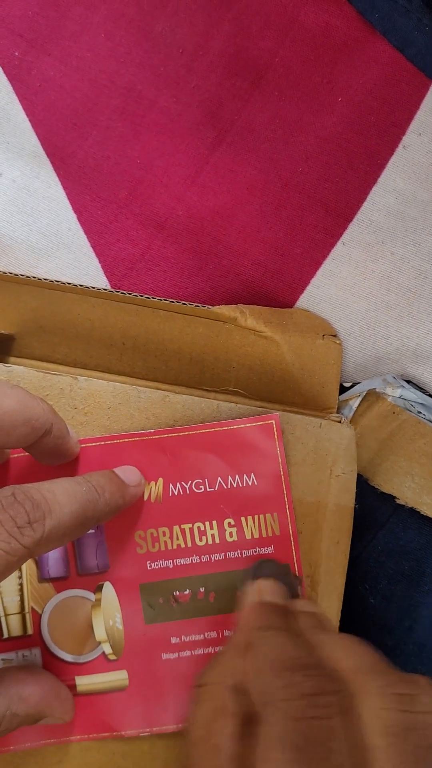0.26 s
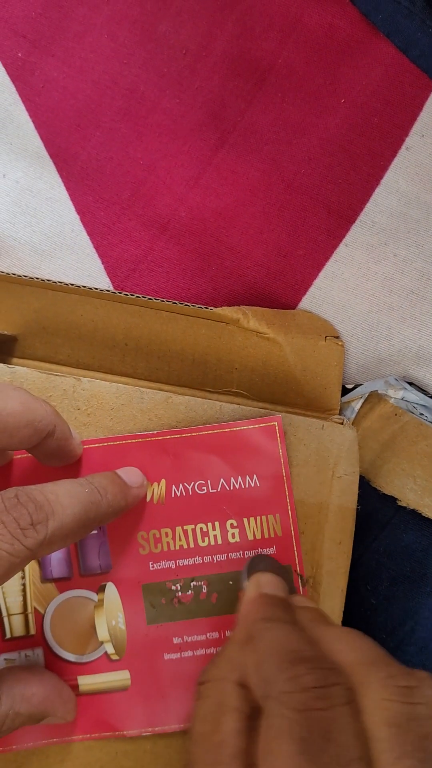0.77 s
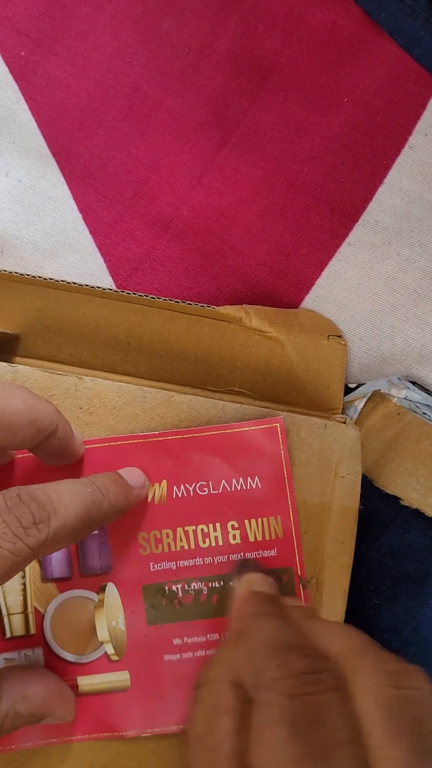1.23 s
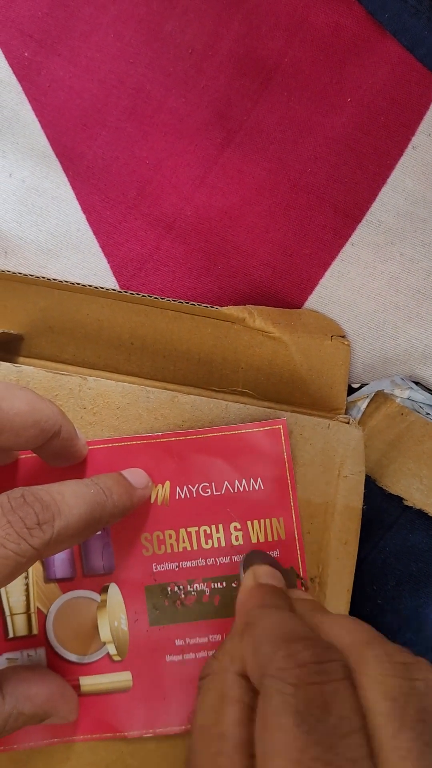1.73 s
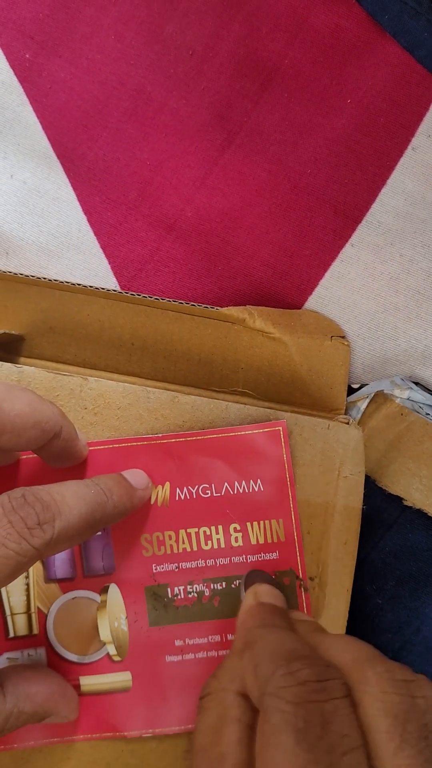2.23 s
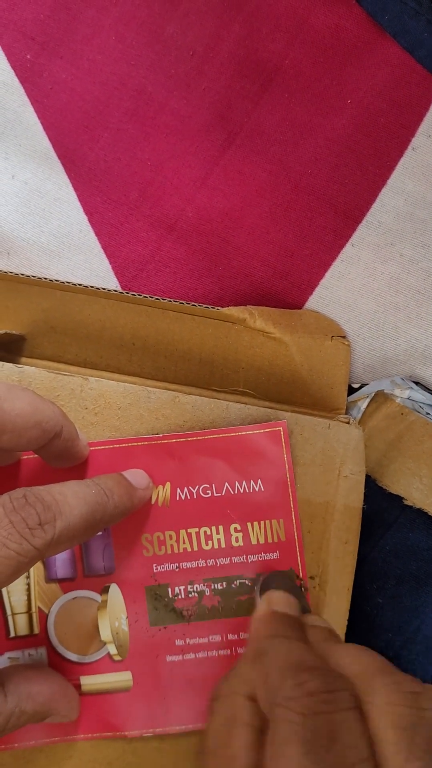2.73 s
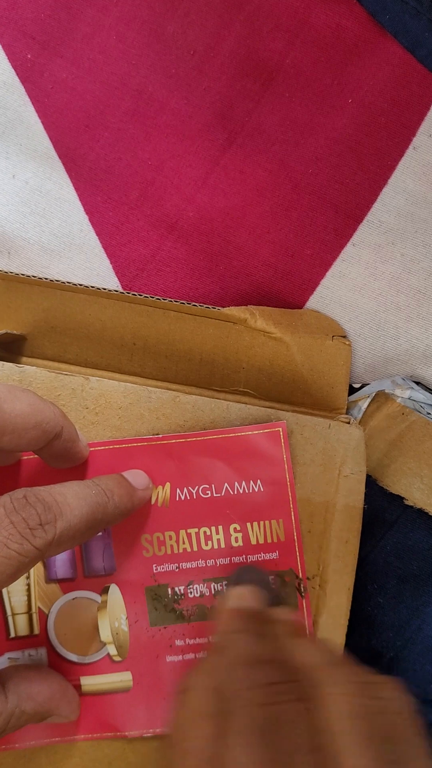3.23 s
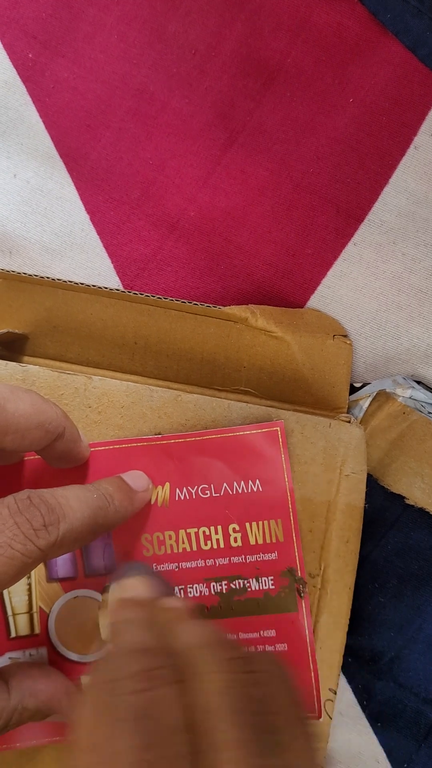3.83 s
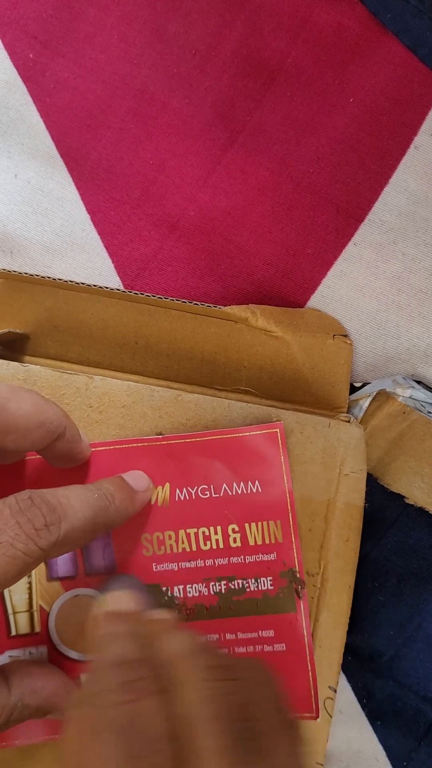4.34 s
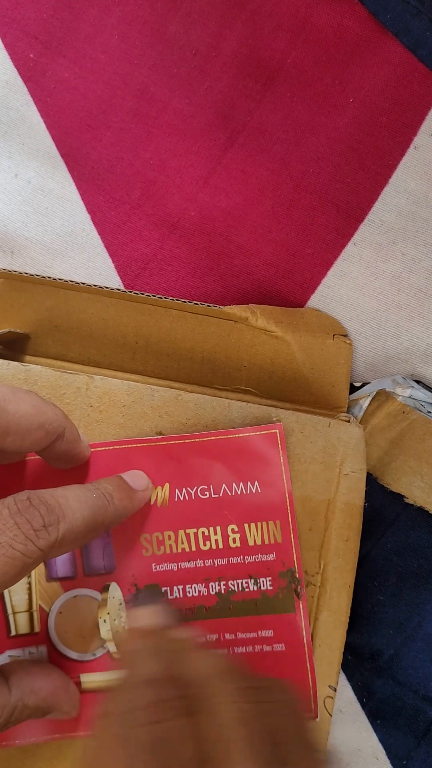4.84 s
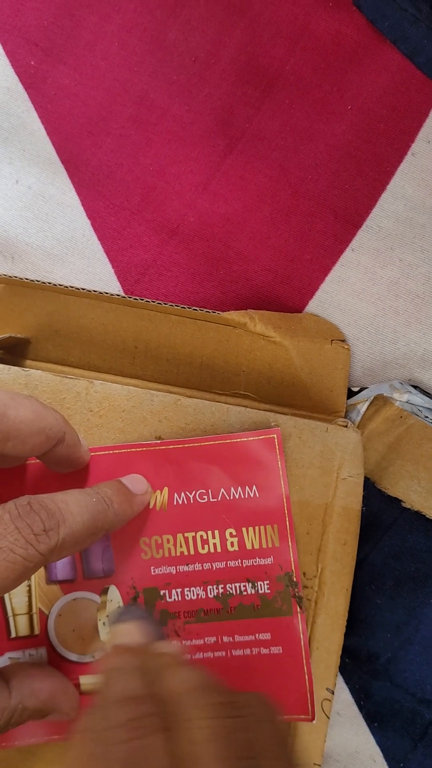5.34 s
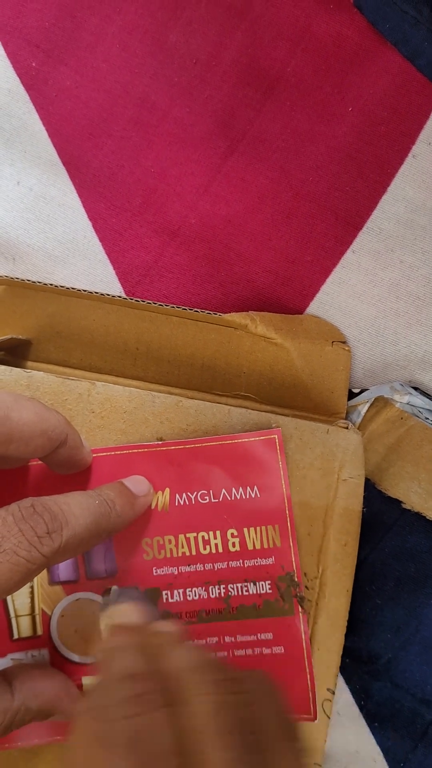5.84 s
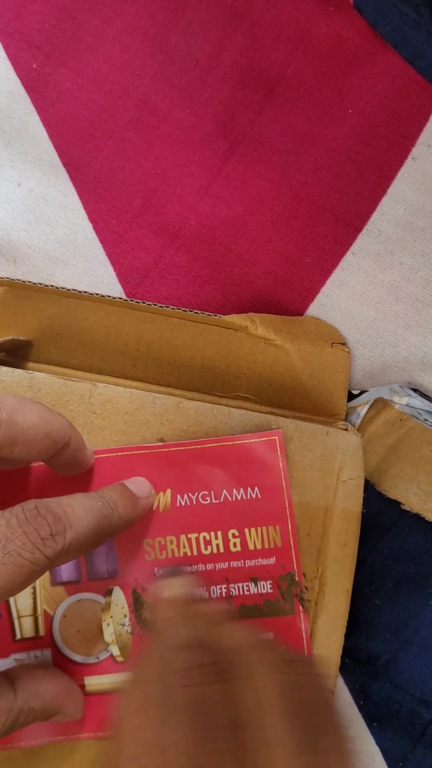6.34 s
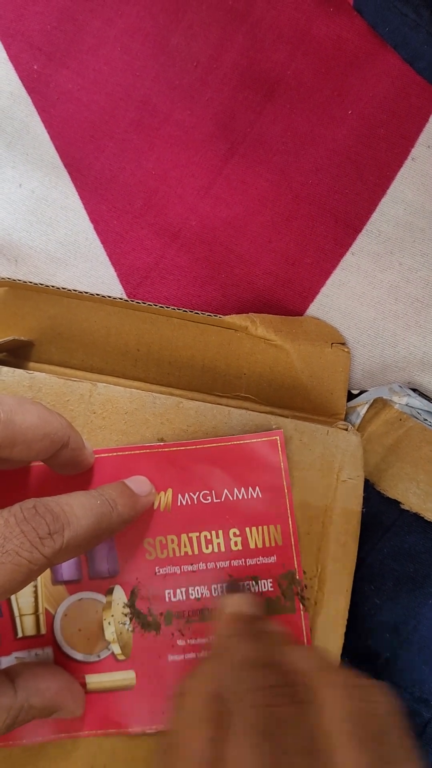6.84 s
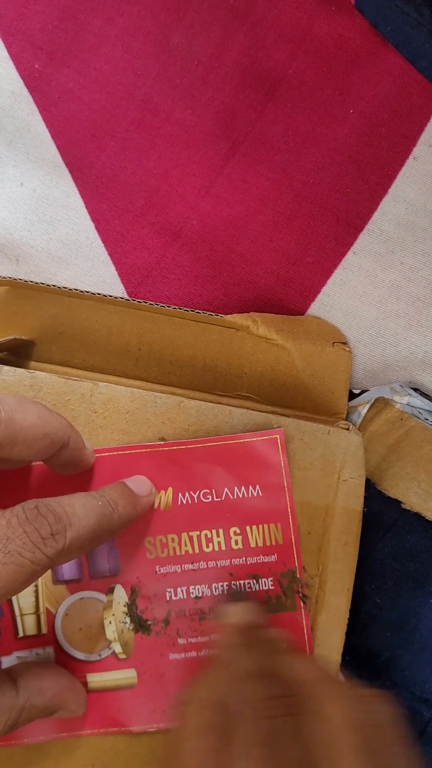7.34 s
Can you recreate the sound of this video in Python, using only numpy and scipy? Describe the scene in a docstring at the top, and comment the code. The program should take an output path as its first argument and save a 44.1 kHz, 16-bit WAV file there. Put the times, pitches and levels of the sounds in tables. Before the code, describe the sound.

A fan hums low and steady while a coin edge rubs a scratch card with fast, even strokes from start to end. The scraping is crisp and papery, with a thin rasp on forward strokes and a boxy flutter below. Flakes snap early on; later there are more tiny clicks as the coin turns. Close stereo microphone, small room, very short echo.

```python
"""In a small room where a fan hums, a coin rubs a scratch card on a cardboard box, eight strokes a second.
Its edge snaps through the coating in tiny random grains that ring the card's resonances, with a thin rasp
on forward strokes. Its stick-and-slip judder booms in the box. Now and then the edge tears off a large
flake, the coin taps the card as it turns round, or the hand jolts the box. The fan is a few wavering
tones over filtered noise."""
import sys
import numpy as np
from scipy import signal
from scipy.fft import rfft, irfft, next_fast_len
from scipy.io import wavfile
from scipy.ndimage import uniform_filter1d

SR = 44100
rng = np.random.default_rng(int(sys.argv[2]) if len(sys.argv) > 2 else 0)


def master(y):
    """Save y as 16-bit WAV."""
    cut = np.clip(np.atleast_2d(y).T, -1, 1)
    pcm = np.round(cut * 32767)  # scale
    wavfile.write(sys.argv[1], SR, pcm.astype(np.int16))


N = 334719
TIME = np.arange(N) / SR


def undb(db):
    """Turn decibels into gain."""
    return 10 ** (np.asarray(db) / 20)


def unit(x):
    """Scale to an rms of 1."""
    return x / np.sqrt(np.mean(x ** 2))


def curve(table):
    """Join the points of a (t/s, value) table with straight lines."""
    return np.interp(TIME, *np.transpose(table))


def walk(rate):
    """Random wandering: a new level every 1 / rate seconds, joined by slopes; rms 1."""
    hold = max(int(SR / rate), 2)
    steps = np.repeat(rng.standard_normal(N // hold + 1), hold)
    return unit(uniform_filter1d(steps, hold)[:N])


def burst(start, rise, decay):
    """A quick swell that dies away."""
    age = np.maximum(TIME - start, 0)
    fade = np.minimum(np.maximum(age - rise, 0) / decay, 20)
    return np.minimum(age / rise, 1) * np.exp(-fade)


def filtered(x, response):
    """Pass x through a response given as a function of frequency."""
    size = next_fast_len(N + 8192)
    f = np.arange(size // 2 + 1) * SR / size
    return irfft(rfft(x, size) * response(f), size)[..., :N]


def resonance(f, hz, width):
    """Response of a band-pass applied twice, gain 1 at the centre."""
    return (1j * f * width / (hz ** 2 - f ** 2 + 1j * f * width)) ** 2


def ring(drive, mode):
    """One way the card or box vibrates (a mode), with its own level and phase at the left and right ports."""
    hz, width, left_db, right_db, lead = mode[:5]
    phases = np.exp(.5j * lead * np.array([[1], [-1]]))
    ports = undb([[left_db], [right_db]]) * phases
    return filtered(drive, lambda f: ports * resonance(f, hz, width))


def power_gain(modes):
    """Rms that the modes give out for white drives of rms 1."""
    width, left_db, right_db = np.transpose(modes)[1:4]
    power = undb(left_db) ** 2 + undb(right_db) ** 2
    return np.sqrt(np.sum(width * power) * np.pi / (4 * SR))


def blows(table, modes, mode_db, bounces):
    """Short pushes, each with its bounces (delay/s, size), ring the modes."""
    lead = 100  # samples of space before the push, because phase leads spread the ring backwards
    push = signal.unit_impulse(N, lead)
    knock = sum(undb(db) * ring(push, mode) for mode, db in zip(modes, mode_db))
    knock = knock[:, :SR // 10]
    pushes = np.zeros(N)
    # every bounce comes a little early or late
    stretches = rng.uniform(0.793, 1.21, (len(table), len(bounces)))
    for (start, db), row in zip(table, stretches):
        for (delay, size), stretch in zip(bounces, row):
            at = int((start + delay * stretch) * SR) - lead
            pushes[at] += size * undb(db)
    return signal.oaconvolve(pushes[None], knock / np.abs(knock).max(), axes=1)[:, :N]


# the fan's tones: f/Hz, level/dB (rms, before wavering)
HUM = [(47, -61), (50, -47), (62, -67), (72.3, -48.5), (78, -62), (125.4, -37), (150, -53), (265, -41.5)]
# colour of the fan's rush of air: f/Hz, relative level/dB
AIR_COLOUR = [(20, -28), (45, -6.5), (75, 1.5), (95, -14.5), (130, -1.5), (250, -4), (380, -10.5),
              (560, -15), (740, -11), (1400, -23), (1700, -25), (2200, -22), (2750, -32), (7000, -43.5),
              (16000, -52.5)]
AIR_DB = -35.5  # level of the rush, before it wavers


def fan():
    """Wavering tones over a soft rush of air; the rush is more alike left and right in the bass."""
    tones = 0
    for hz, db in HUM:
        waver = undb(1.1 * walk(9))
        phase = 2 * np.pi * hz * TIME + .5 * walk(3)
        tones = tones + undb(db) * waver * np.sqrt(2) * np.sin(phase)
    hz, db = np.transpose(AIR_COLOUR)
    colour = lambda f: undb(np.interp(np.log(f + 1), np.log(hz), db))
    mid = filtered(rng.standard_normal(N), colour)
    side = filtered(rng.standard_normal(N), lambda f: colour(f) * np.minimum(0.45 + f / 9000, 1))
    air = (mid + side * np.array([[1], [-1]])) / np.std(mid)
    return tones + air * undb(AIR_DB + 1.7 * walk(25))


def room(x, t60, wet_db):
    """A short, soft tail from nearby walls and bedding, fading 60 dB in t60 seconds."""
    t = TIME[:SR // 2]
    tail = rng.standard_normal((2, len(t))) * undb(-60 * t / t60) * (t > .004)
    tail /= np.sqrt(np.sum(tail ** 2, axis=1, keepdims=True))
    return x + undb(wet_db) * signal.oaconvolve(x, tail, axes=1)[:, :N]


# resonances of the box: f/Hz, width/Hz of each filter pass, left level/dB, right level/dB, left lead/rad
BOX = [(137.8, 41, -1, 2, 1), (176.5, 15.6, -0.5, 1, 0.22), (231.7, 38, 3.5, 1, 0.24),
       (277.5, 86, -1, 1.5, 0.42), (389, 192, -23.5, -10, 0.38)]
# the hand jolts the box: t/s, relative level/dB
JOLTS = [(0.651, -14.5), (0.97, -13.5), (1.228, -15.5), (1.955, -14.5), (2.946, -14), (2.958, -15),
         (2.972, -12), (3.188, -17), (3.292, -16.5), (3.433, -8.5), (3.672, -14), (4.672, -11.5),
         (5.442, -9.5), (6.124, -15.5), (6.85, -16.5), (7.1, -17)]


def jolts():
    """Each jolt of the hand is one push that mainly rings the lower resonances of the box."""
    return blows(JOLTS, BOX, mode_db=[-2.5, 4, 0.0, 4.0, -30], bounces=[(0, 0.76)]) * undb(-1.5)


# resonances of the card: f/Hz, width/Hz of each filter pass, left level/dB, right level/dB, left lead/rad,
# extra level/dB under a blow, forward minus backward stroke level/dB
CARD = [(455, 125, -11.5, 6, .5, -0.5, 5.5), (761, 225, 5, 1, -0.5, -13, -1.5),
        (977, 210, -1, -9.5, 0.15, 6, 4), (1280, 397, -3.5, 5, 0.85, 0, 1), (1448, 148, 4, 2, 2.5, -4, 1.5),
        (1987, 220, 0, -12, -0.04, 11, -1.5), (2330, 140, -4.5, -12, 1.86, 6, -5.5),
        (2866, 470, -12, -13.5, 1.35, 4.5, 3), (4155, 340, -23, -21.5, 0.95, 10, -3),
        (4675, 750, -22.5, -25, -1, 1, 4.5), (5350, 1600, -19.5, -19, -3.2, -12, 4.5),
        (7180, 3800, -26.5, -22.5, 3.5, -9, 2), (10750, 1630, -22, -26, 1.5, -16, 2.5),
        (12450, 1300, -28, -31, -1, -9.5, 5), (13800, 1100, -23, -38, 2, -15, 0),
        (15500, 1300, -27, -33, -2, -5, 3)]
CARD_BLOW_DB = [mode[5] for mode in CARD]
# the coin taps the card as it turns round: t/s, relative level/dB
TAPS = [(1.4141, -22), (1.6575, -18.5), (1.8028, -36), (3.3627, -27.5), (3.5996, -24), (3.8376, -18.5),
        (4.094, -19.5), (4.3429, -29.5), (4.8328, -25.5), (5.0723, -25), (5.3471, -22.5), (5.5851, -22.5),
        (5.8355, -16), (7.0238, -27.5), (7.2783, -22.5), (7.5257, -23)]
# light touches around the blow of each tap: typical delay/s, size (a plain factor)
TAP_BOUNCES = [(-.003, 0.038), (-.0008, 0.32), (.0008, 0.89), (.0024, .75), (.0044, .25)]
TAP_DAMPING = 1.38  # the coin pressed on the card shortens its ring by this factor


def taps():
    """A tap is a short rattle on the damped card, and one knock that reaches the box through it."""
    pressed = [(hz, width * TAP_DAMPING, *ports) for hz, width, *ports in CARD]
    rattles = blows(TAPS, pressed, CARD_BLOW_DB, TAP_BOUNCES) * undb(6.5)
    knocks = blows(TAPS, BOX, mode_db=[-23, -14, -14, 9, 23.5], bounces=[(.001, 1)]) * undb(0.5)
    return rattles + knocks


# the edge catches and tears off a large flake: t/s, relative level/dB
TEARS = [(0.126, -27.5), (0.156, -27.5), (0.403, -28), (0.413, -21), (0.438, -27), (0.641, -28.5),
         (0.655, -24.5), (0.887, -27.5), (0.914, -22.5), (4.02, -33.5), (4.668, -28.5), (4.79, -34),
         (5.249, -28.5), (6.936, -35)]


def tears():
    """A large flake snaps the card, and tugs the box through it."""
    snaps = blows(TEARS, CARD, CARD_BLOW_DB, bounces=[(.001, 0.97)]) * undb(4.5)
    tugs = blows(TEARS, BOX, mode_db=[-26, -16, -8, 2.5, 10.5], bounces=[(0, 1), (.003, 0.89)]) * undb(7)
    return snaps + tugs


# strokes of the coin, forward and back in turn: t/s, relative level/dB
STROKES = [(0.046, -39), (0.175, -38), (0.304, -37.5), (0.438, -39.5), (0.576, -34.5), (0.681, -36),
           (0.813, -37), (0.945, -38.0), (1.075, -37.5), (1.197, -36.5), (1.314, -35), (1.421, -40),
           (1.554, -39.0), (1.683, -41), (1.793, -38.0), (1.926, -39.5), (2.041, -35), (2.172, -37.0),
           (2.295, -33), (2.421, -40.5), (2.554, -34.5), (2.668, -36.5), (2.792, -34.5), (2.916, -36),
           (3.033, -39), (3.163, -36.5), (3.264, -35.5), (3.391, -37), (3.498, -38.0), (3.632, -37),
           (3.747, -39), (3.871, -41), (3.999, -37.5), (4.124, -40), (4.247, -36.5), (4.378, -37.5),
           (4.487, -39), (4.62, -39.5), (4.731, -33.5), (4.858, -38.0), (4.974, -33), (5.107, -36.5),
           (5.242, -33), (5.371, -36.5), (5.5, -38.5), (5.618, -39.5), (5.742, -39.5), (5.858, -42),
           (5.987, -40), (6.106, -42.0), (6.234, -41.0), (6.339, -42.5), (6.447, -39.5), (6.579, -43.5),
           (6.685, -37.5), (6.802, -38.5), (6.922, -33.5), (7.049, -38), (7.177, -33), (7.311, -36.5),
           (7.431, -33)]
# how much of the time to the next stroke the coin slides; the first drag on: t/s, share (0-1)
SLIDING = [(0, 0.75), (.8, 0.81), (1.15, 0.63), (3.0, 0.6), (4.4, 0.58), (5.2, .66), (6.3, 0.61),
           (7.5, 0.61)]
LAST_STROKE_S = 0.11  # time allowed for the final stroke


def strokes():
    """Each stroke as (start, end, goes forward, dB); it fills a share of the time to the next."""
    starts = [start for start, db in STROKES]
    gaps = np.diff(starts, append=starts[-1] + LAST_STROKE_S)
    ends = starts + gaps * np.interp(starts, *np.transpose(SLIDING))
    return [(start, end, k % 2 == 0, db) for k, ((start, db), end) in enumerate(zip(STROKES, ends))]


def contact(start, end, rise, fall):
    """The coin gathers speed, slides, and slows to the turn."""
    points = [start - rise, start + rise, max(end - fall, start + rise), end + fall]
    return np.interp(TIME, points, [0, 1, 1, 0])


def grains(per_s, spread_db):
    """Sizes of snaps at random moments: many small, few large."""
    sizes = undb(spread_db * np.minimum(rng.exponential(size=N), 5))
    return unit(sizes * (rng.random(N) < per_s / SR))


# the two directions, forward then back: half the rise time/s, extra bite at the start (0-1),
# treble level/dB, share of the stroke where the hand leans hardest, box level/dB added to the stroke's
WAYS = [(.0045, 0.32, -0.9, 0.25, 10.5), (.010, 0.15, 3.4, 0.59, 15)]
LEAN_S = 0.012  # spread of the heaviest pressure around its peak
SLIP_HZ = 258.3  # centre of the wandering judder in step with the lid


def judder():
    """The coin sticks and slips, partly in step with the lid, shaking it most where the hand leans hardest."""
    load = np.zeros(N)
    for start, end, pushed, db in strokes():
        lean_at, box_db = WAYS[0 if pushed else 1][3:]
        heaviest = start + (end - start) * lean_at
        lean = np.exp(-.5 * ((TIME - heaviest) / LEAN_S) ** 2)
        slide = 0.81 * contact(start, end, rise=0.005, fall=0.022)
        load += undb(db + box_db) * np.maximum(slide, lean)
    slips = load * grains(per_s=900, spread_db=.5) * undb(-3.5)
    loose = sum(ring(slips * rng.choice([-1, 1], N), mode) for mode in BOX) / power_gain(BOX)
    pitch = SLIP_HZ * np.exp(.17 * walk(170))
    cycle = np.sin(2 * np.pi * np.cumsum(pitch) / SR)
    locked = sum(ring(load * cycle, mode) for mode in BOX)
    return loose + locked * np.std(load) / np.std(locked) * undb(-2.0)


# the edge's thin rasp on forward strokes: t/s, level/dB added to the stroke's
RASP = [(0, -20.5), (3.0, -16), (4.3, -19), (6.2, -35), (7.6, -27)]
RASP_HZ, RASP_SPREAD_HZ = 5200, 240  # centre of the wandering pitch, and the blur around it


def edge():
    """Pushed forward, the edge gives a narrow, thin rasp whose pitch slides with the angle of the coin."""
    pushing = np.zeros(N)
    for start, end, pushed, db in strokes():
        if pushed:
            pushing += contact(start, end, rise=0.008, fall=.008) * undb(db)
    phase = 2 * np.pi * np.cumsum(RASP_HZ * np.exp(0.036 * walk(28))) / SR
    phase = phase + 0.68 * np.array([[-1], [1]])  # it reaches the right port first
    # slow noise, partly shared left and right, turns the tone into a narrow band
    chance = rng.standard_normal((2, 2, N)) * .5 + rng.standard_normal((2, 1, N))
    a, b = filtered(chance, lambda f: np.exp(-.5 * (f / RASP_SPREAD_HZ) ** 2))
    rasp = unit(a * np.cos(phase) + b * np.sin(phase))
    return rasp * pushing * undb(curve(RASP) + 3.2 * walk(220))


def chatter(per_s, spread_db, decay, steady):
    """Stick and slip: uneven jerks, each fading in a few milliseconds, over a steady slide."""
    gap, size = rng.standard_normal((int(2 * per_s * N / SR), 2)).T
    at = (np.cumsum(np.exp(.4 * gap)) * SR / per_s).astype(int)
    inside = at < N
    jerks = np.zeros(N)
    jerks[at[inside]] = undb(spread_db * np.clip(size, -2, 2))[inside]
    fading = signal.lfilter([1], [1, -np.exp(-1 / (decay * SR))], jerks)
    return unit(steady + uniform_filter1d(fading, size=90))


def mode_drives(mode, coarse, fine, torn, forward):
    """How hard the scraping drives one mode; it wanders as the coin travels over the mode's nodes."""
    hz, forward_db = mode[0], mode[-1]
    share = np.clip((hz - 2500) / 7000, 0, 1)  # fine grains feed the high modes
    # flakes crackle in the upper middle
    tear = np.exp(-.5 * (np.log(hz / 3700) / 0.76) ** 2) * undb(3.5)
    slide = ((1 - share) * coarse + share * fine) * undb(forward * forward_db)
    return np.hypot(slide, tear * torn) * undb(1.05 * walk(16))


# thick coating crackles until it is worn away: t/s, crackle level/dB added to the scrape's
COATING = [(0, -4.5), (1.0, -5), (1.4, -7.5), (4.2, -6), (7.6, -25)]
# brightness of the scrape: t/s, treble level/dB before direction and bite add to it
BRIGHTNESS = [(0, 1), (1.0, -3), (1.5, 0.5), (3.3, 2.5), (4.1, -2), (5.1, 2.5), (5.7, 0), (6.35, -5),
              (7.0, 2), (7.6, 0.5)]
RELEASE_S = .014  # half the time in which the coin slows to the turn
BITE_RISE_S, BITE_DECAY_S = 0.011, 0.035  # the edge digs in at the start of a stroke
BITE_TREBLE_DB = 4  # digging in on a forward stroke is brighter than sliding
FLAKE_GRIT_DB, FLAKE_TREBLE_DB = 2, -18  # crackle after a large flake, and its fine grains


def scrape():
    """Coating breaks in bursts of grains; each grain meets the card's modes with its own strength."""
    sliding, forward, digging = np.zeros((3, N))
    for start, end, pushed, db in strokes():
        # going forward the edge digs in at once; coming back it eases in
        rise, bite = WAYS[0 if pushed else 1][:2]
        dig = burst(start, BITE_RISE_S, BITE_DECAY_S)
        sliding += contact(start, end, rise, RELEASE_S) * undb(db) * (1 + bite * dig)
        forward += (.5 if pushed else -.5) * contact(start, end, rise=0.0051, fall=0.0087)
        digging += pushed * dig
    way_db = np.where(forward > 0, WAYS[0][2], WAYS[1][2])
    bright_db = curve(BRIGHTNESS) + way_db + BITE_TREBLE_DB * digging
    jerks = chatter(per_s=105, spread_db=3.0, decay=0.0031, steady=0.19)
    flakes = sum(burst(start, rise=0.0012, decay=0.0085) * undb(db + FLAKE_GRIT_DB) for start, db in TEARS)
    fine = sliding * undb(bright_db) * unit(jerks ** 0.69) + flakes * undb(FLAKE_TREBLE_DB)
    coarse = sliding * jerks * undb(2.1 * walk(220))
    torn = coarse * undb(curve(COATING)) + flakes
    snaps = grains(per_s=7500, spread_db=2.5)
    out = 0
    for mode in CARD:
        apart = np.clip(0.43 + mode[0] / 16000, 0, .85)  # short waves reach the two ports less alike
        shared = np.sqrt(1 - apart ** 2) * rng.standard_normal(N)
        weights = shared + apart * rng.standard_normal((2, N))
        out = out + ring(snaps * weights * mode_drives(mode, coarse, fine, torn, forward), mode)
    return out / power_gain(CARD)


def scene():
    """Card and box sound with the room's tail; the fan is added without it."""
    blows_heard = jolts() + taps() + tears()
    rubbing = judder() + edge() + scrape()
    return fan() + room(blows_heard + rubbing, t60=0.18, wet_db=-15.0)


TOP_HZ = 15900


def record(dry):
    """A steep low-pass cuts the top of the treble."""
    return signal.sosfilt(signal.ellip(10, .2, 70, TOP_HZ, fs=SR, output="sos"), dry)


dry = scene()
out = record(dry)
master(out)
```